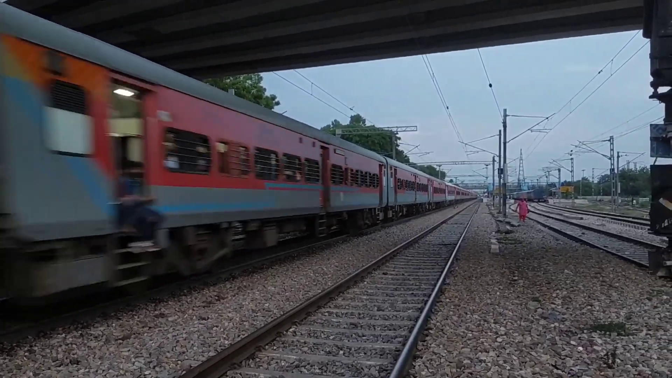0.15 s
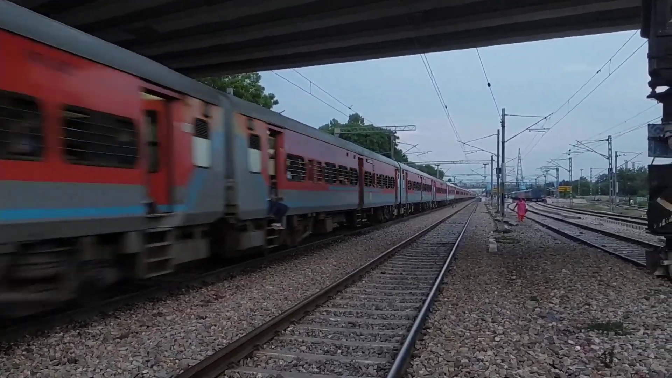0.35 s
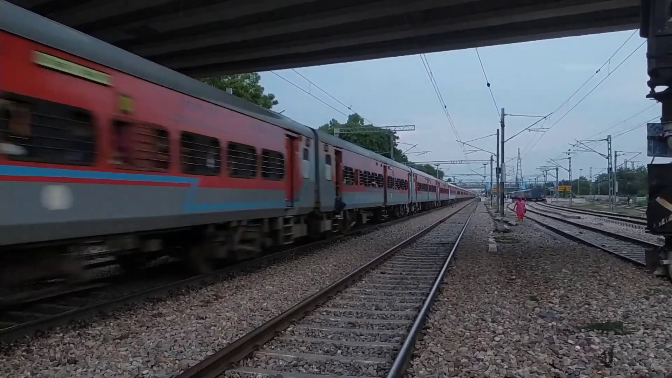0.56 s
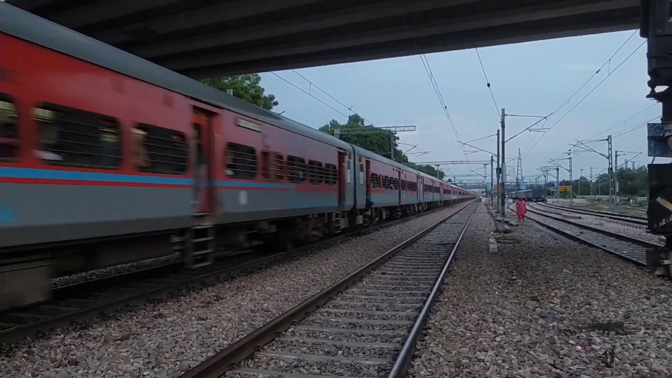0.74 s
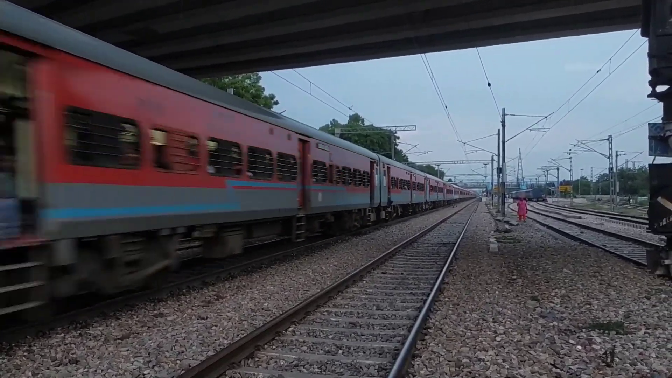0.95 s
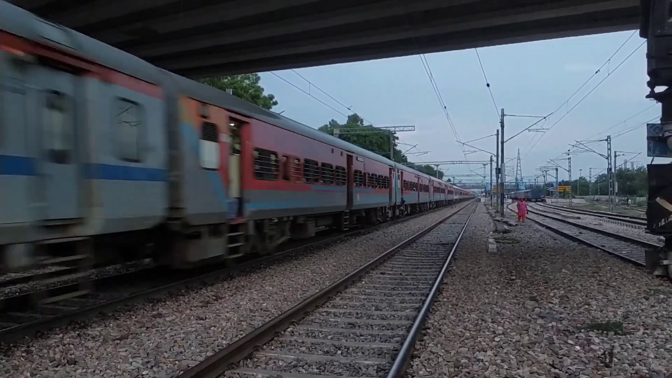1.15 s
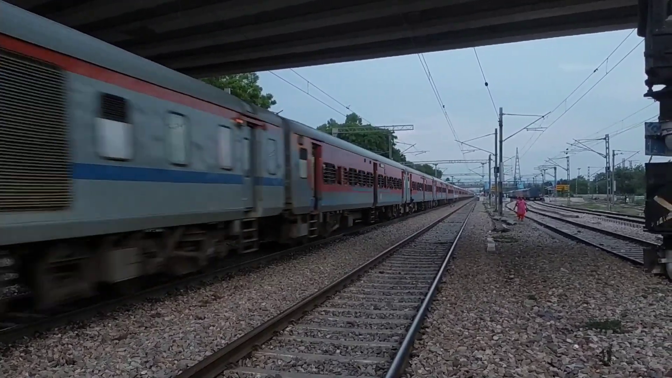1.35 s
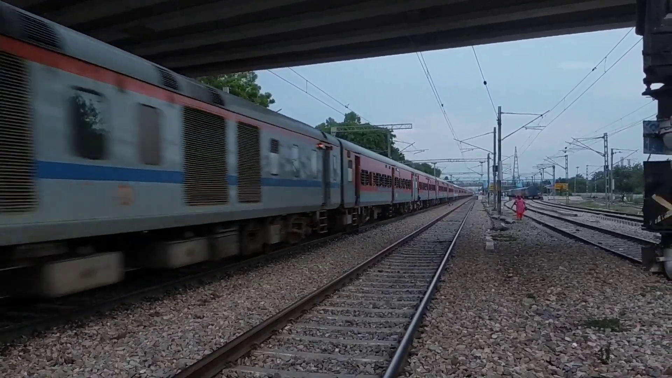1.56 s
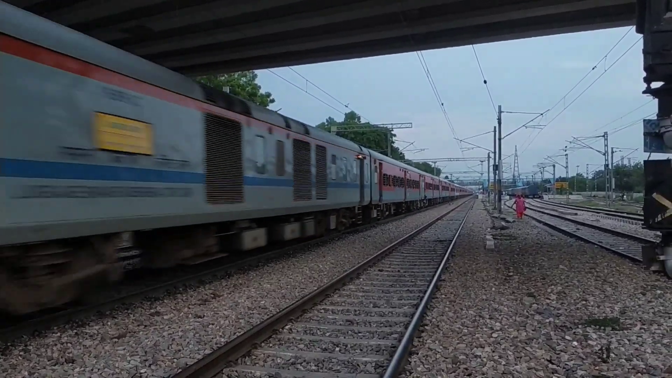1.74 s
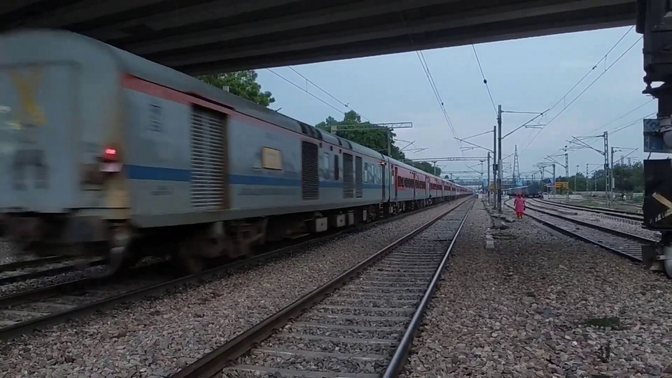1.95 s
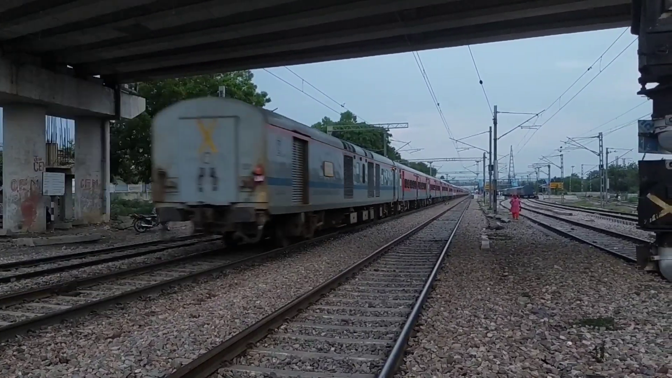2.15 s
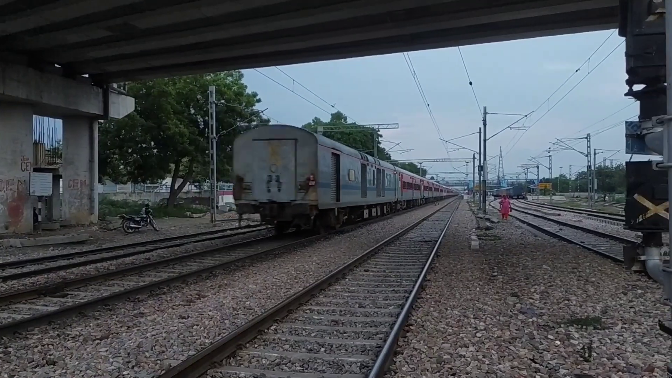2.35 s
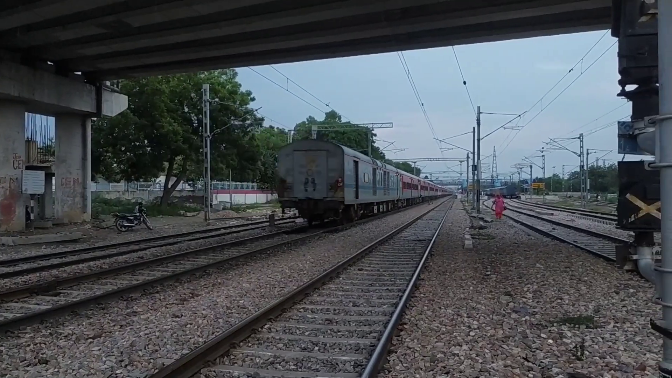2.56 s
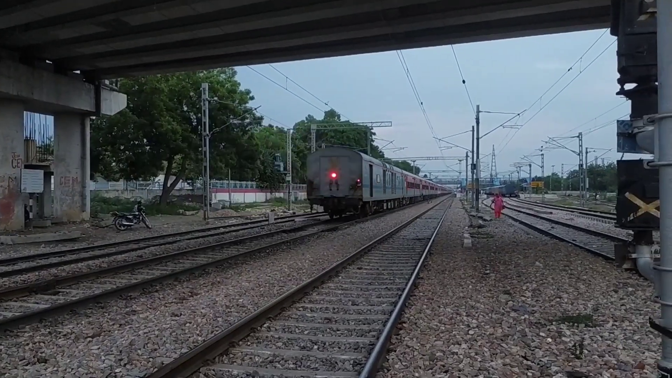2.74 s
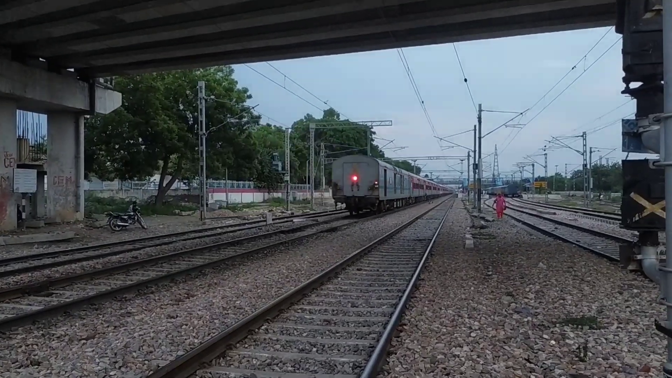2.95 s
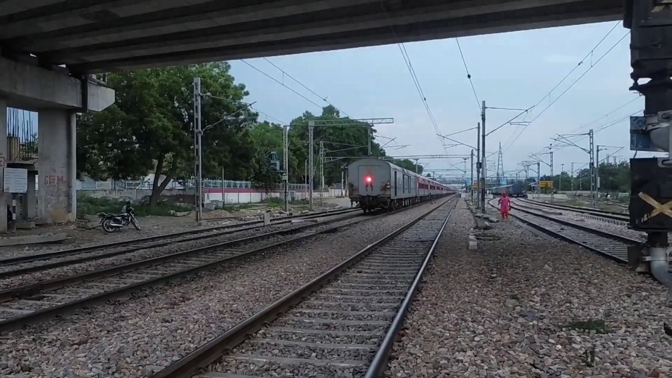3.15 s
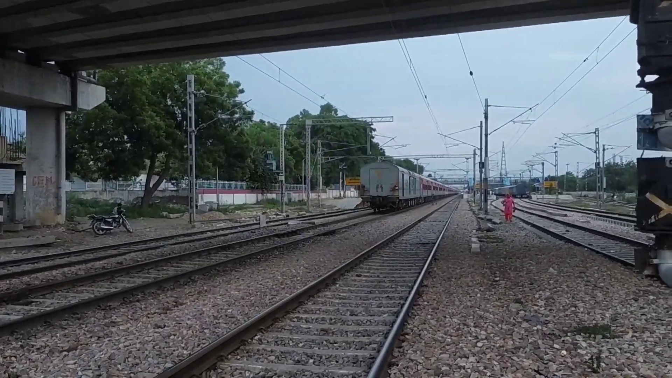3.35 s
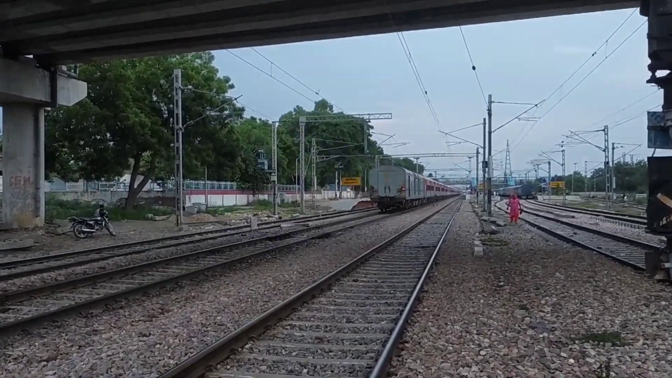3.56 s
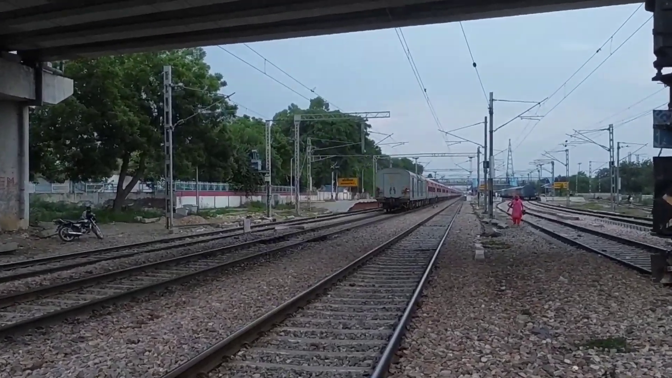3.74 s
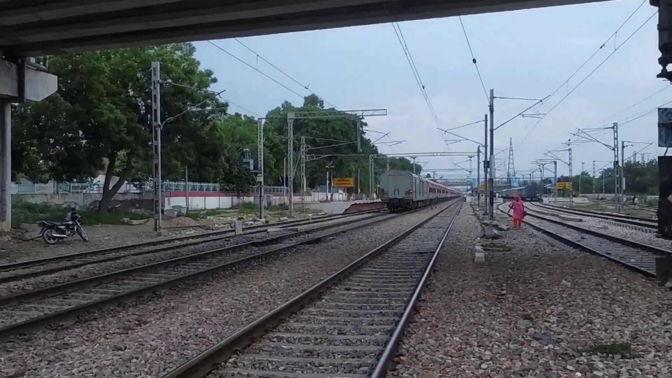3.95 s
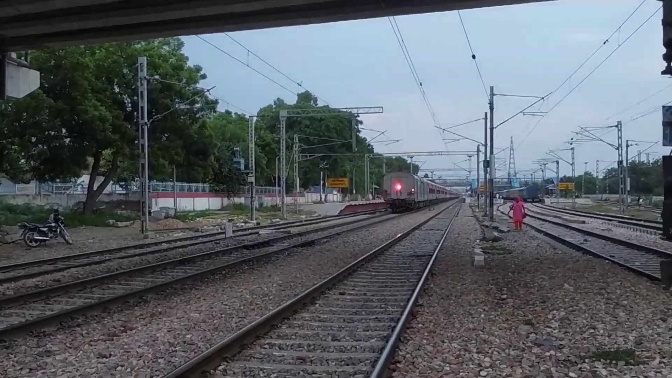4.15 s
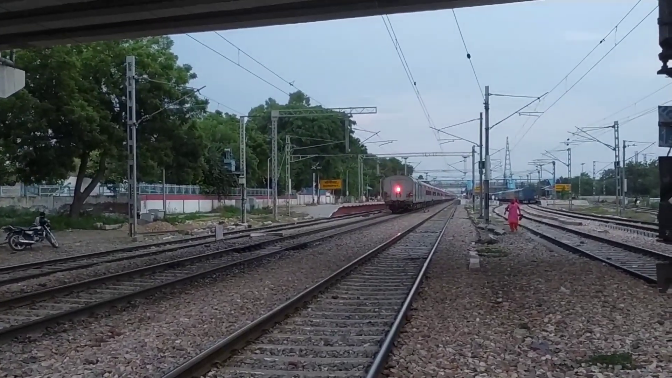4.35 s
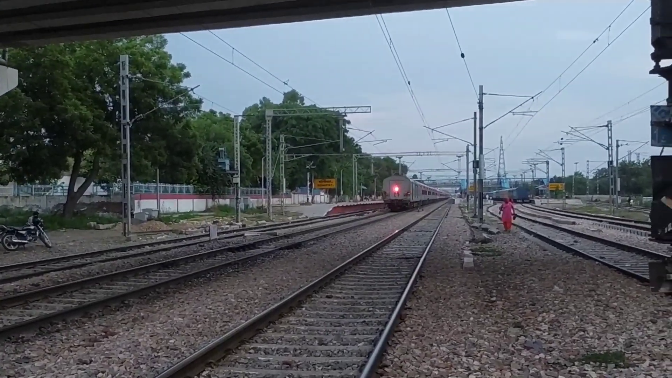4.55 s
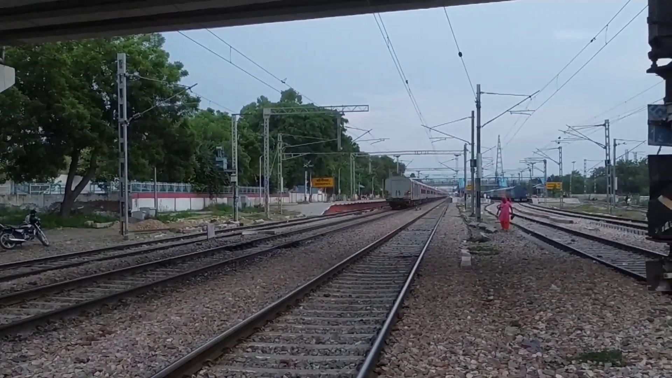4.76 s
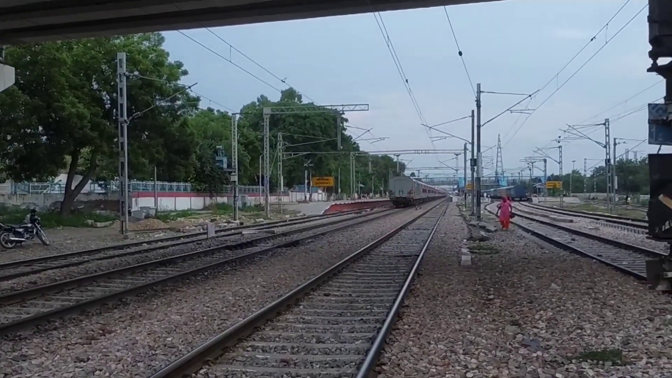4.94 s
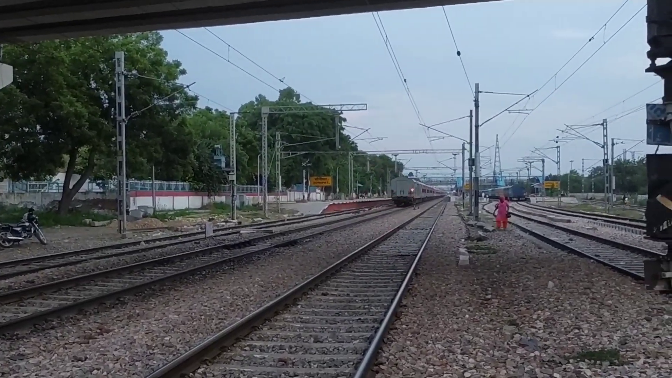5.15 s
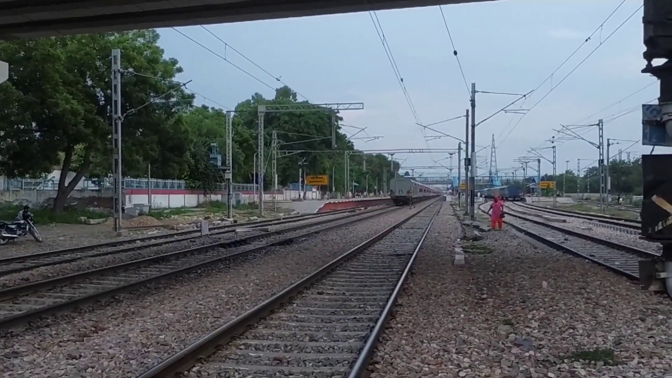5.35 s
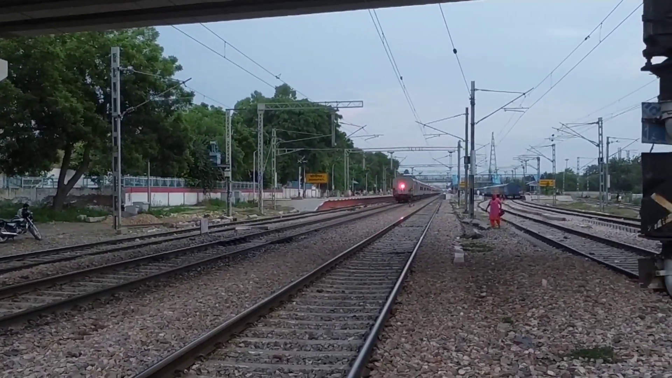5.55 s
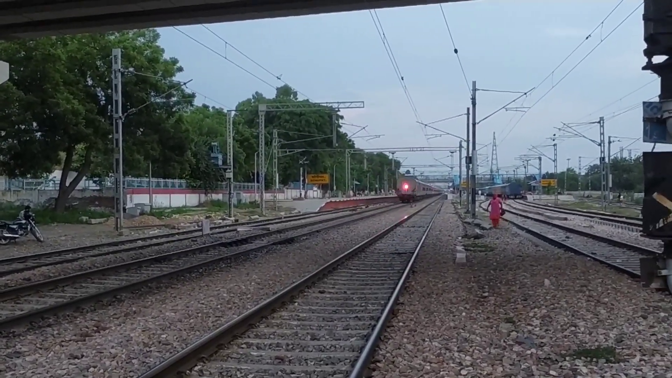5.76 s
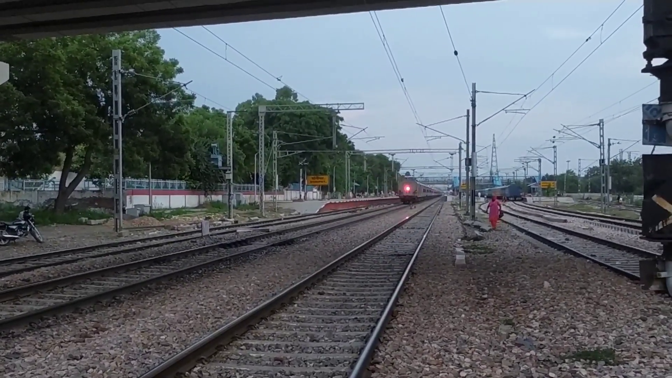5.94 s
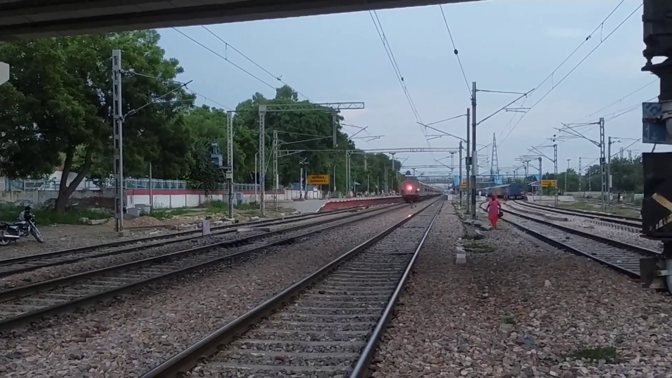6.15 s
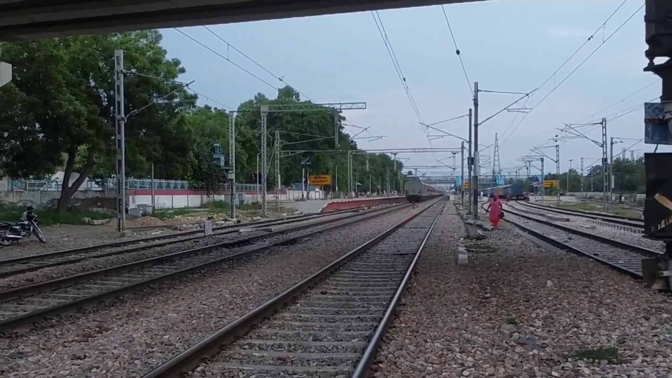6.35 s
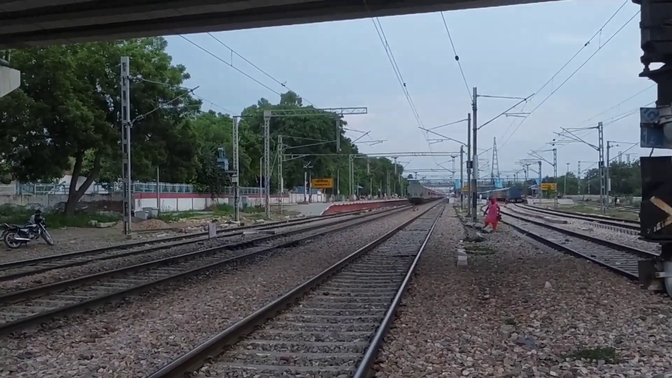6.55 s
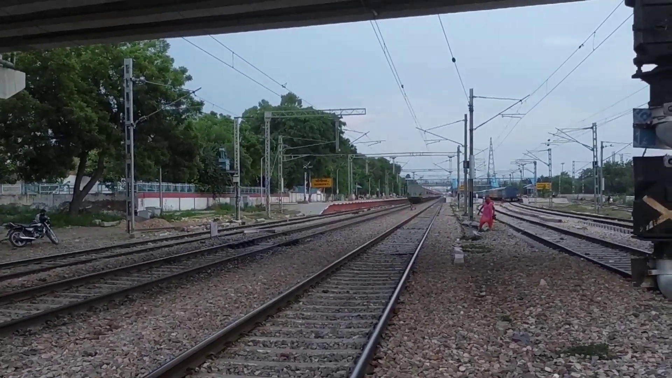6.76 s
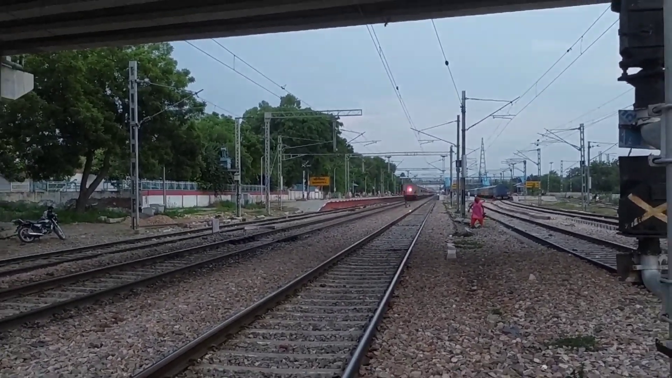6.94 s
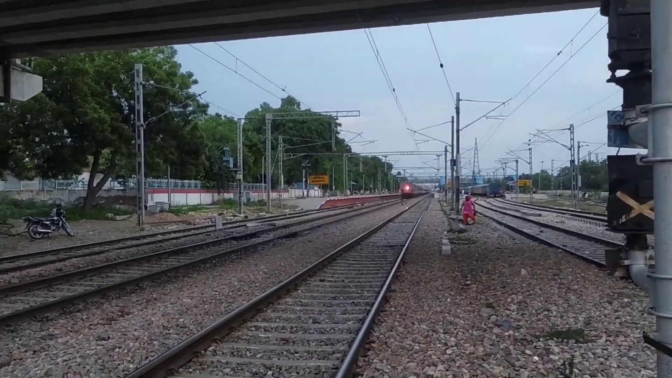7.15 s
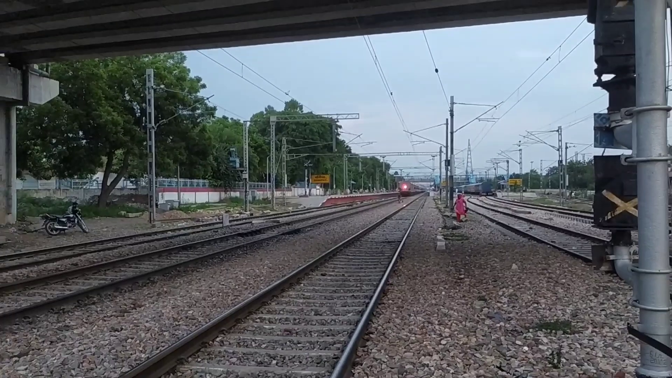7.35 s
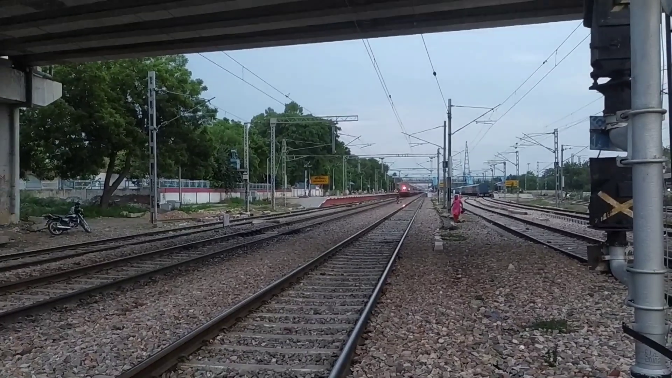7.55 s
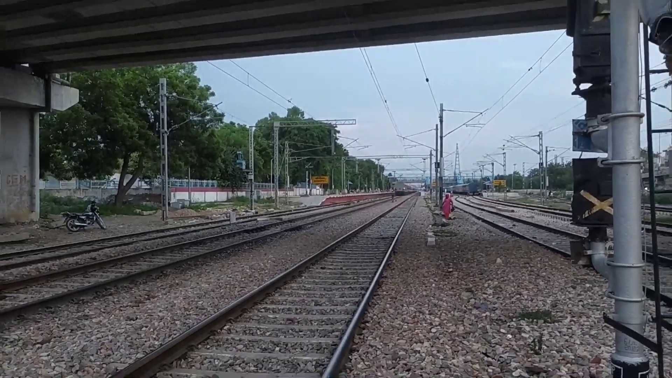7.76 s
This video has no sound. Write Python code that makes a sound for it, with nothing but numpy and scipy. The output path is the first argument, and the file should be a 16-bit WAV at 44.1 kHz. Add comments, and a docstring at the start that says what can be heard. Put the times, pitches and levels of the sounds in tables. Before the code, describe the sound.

From 0 to about 1.7 seconds a fast train passes very close: a loud, dense mid-low roar with bass rumble, bright ringing wheels and high hiss, surging about twice a second. Irregular thuds and clangs come roughly every tenth of a second, with short squeals, some sliding downward, and grainy scrapes. The tail passes near 1.75; hiss and roar fall steeply by 3 seconds, with last knocks and scrapes around 2.4 to 2.9 and a low hollow boom at 2.9. Singing rails remain in narrow metallic bands, fading over faint rumble. A distant steady horn emerges after 4, swells through 5 to 7 and fades by 7.8. Steel clacks sound at 4.3 and, sharper, 4.95. Air thumps the microphone near 5.1 and 5.6, amid a faint fluttering squeak at 5.3 to 5.65. A buzzy two-note vehicle horn toots briefly at 5.85 from the bridge. Soft low gusts continue near the end.

```python
"""The last coaches of a passenger train rush past under a road bridge and run off into the distance.
Filtered noise makes the wheels' roar, rumble, ring and hiss; decaying modes make them knock on the rails.
The rails sing on in a few narrow bands behind the train; swelling bands of noise scrape and squeal.
Steady partials sound a far horn, a fluttering squeak and a toot on the bridge, with one low boom and clacks.
The train's wake buffets the microphone with gusts of low noise and short swings of air."""
import sys
import numpy as np
from scipy import signal
from scipy.fft import rfft, irfft, next_fast_len
from scipy.io import wavfile
from scipy.ndimage import uniform_filter1d

SR = 44100
rng = np.random.default_rng(int(sys.argv[2]) if len(sys.argv) > 2 else 0)


def generate_wav(sig):
    """Save sig (samples, or channels by samples) to the path in sys.argv[1] as 16-bit PCM at SR."""
    pcm = np.round(np.clip(np.atleast_2d(sig).T, -1, 1) * 32767).astype(np.int16)
    wavfile.write(sys.argv[1], SR, pcm)


N = 343978

# spectral frames: window and step in samples, then the clock, frame times and bin frequencies
SIZE, HOP = 1024, 256
TIME = np.arange(N) / SR
FRAME_S = np.arange(N // HOP + 5)[:, None] * HOP / SR
BIN_HZ = np.fft.rfftfreq(SIZE, 1 / SR)
# the train's speed, and the moment its last wheels draw level with the microphone
SPEED_M_PER_S, TAIL_S = 32.35, 1.74
# the roar and rumble surge as bogies go by: time between surges and the moment of one of them
SURGE_EVERY_S, SURGE_AT_S = 0.479, 0.53


def amp(db):
    """Decibels to gain."""
    return np.exp(np.asarray(db) * (np.log(10) / 20))


def evened(x):
    """Scales to an rms of 1."""
    return x / np.sqrt(np.mean(abs(x) ** 2) + 1e-20)


def read(points):
    """Reads a spectrum on a log-frequency axis."""
    hz, value = np.transpose(points)
    return np.interp(np.log(BIN_HZ + 1), np.log(hz + 1), value)


def add(mix, start_s, sound):
    """Mixes a sound in at its start time."""
    part = mix[..., max(round(start_s * SR), 0):][..., :sound.shape[-1]]
    part += sound[..., :part.shape[-1]]


def sides(balance_db):
    """Left and right gains for a left-right difference."""
    return np.array([amp(balance_db / 2), amp(-balance_db / 2)])


def smooth(per_frame):
    """Joins frame values by straight lines."""
    return np.interp(TIME, FRAME_S[:, 0], per_frame)


def together(*levels_db):
    """Level of several sounds at once, their powers added."""
    return 10 * np.log10(sum(amp(db) ** 2 for db in levels_db) + 1e-20)


def hump(middle_s, length_s):
    """A smooth rise and fall in dB below its top, 10 dB down at length_s either side."""
    return -10 * ((FRAME_S - middle_s) / length_s) ** 2


def gone(start_s=1.64, span_s=0.87):
    """A straight ramp from 0 to 1, by default as the last van passes and runs down the line."""
    return np.clip((FRAME_S - start_s) / span_s, 0, 1)


def receding(reach_m, steepness, loss_db_per_m=0):
    """Level change as the tail draws away: by distance (steepness 1 = inverse square) and absorption."""
    metres = SPEED_M_PER_S * np.maximum(FRAME_S - TAIL_S, 0)
    return -10 * steepness * np.log10(1 + (metres / reach_m) ** 2) - loss_db_per_m * metres


def surge(every_s, at_s, last_s=2.33, fade_s=0.25):
    """A regular swell between -1 and 1 that fades out once the train is by."""
    return np.cos(2 * np.pi * (FRAME_S - at_s) / every_s) * (1 - gone(last_s, fade_s))


def bearing_lag(near_ms=0.31, far_ms=0.054, bass_hz=420):
    """Lag between ports, shrinking as the train moves from the side to straight ahead; less in the bass."""
    lag_ms = near_ms + (far_ms - near_ms) * gone(1.65, 1.17)
    return lag_ms * BIN_HZ / np.hypot(BIN_HZ, bass_hz)


def patches(size):
    """Random unevenness, smooth over size = (frames, bins)."""
    z = rng.standard_normal((len(FRAME_S), len(BIN_HZ)), dtype=np.float32)
    over_time = uniform_filter1d(z, size[0], 0, mode="wrap")
    return evened(uniform_filter1d(over_time, size[1], 1, mode="wrap"))


def resonances(modes, shift=1):
    """Power response of steep-sided resonances, their centres scaled by shift."""
    # the factor .78 makes each width the full width at half power
    return sum(amp(db) ** 2 / (1 + ((BIN_HZ - hz * shift) / (.78 * width)) ** 2) ** 2
               for hz, width, db in modes)


def noise(colour, level_db, likeness, lag_ms=0, balance_db=0):
    """Noise of a given colour and level as two microphone ports hear it, the right one first."""
    draws = rng.standard_normal((2, len(FRAME_S), len(BIN_HZ), 2), dtype=np.float32)
    left, other = draws.view(np.complex64)[..., 0]
    same = np.float32(np.clip(likeness, 0, 1))
    lead = np.float32(2 * np.pi * BIN_HZ * lag_ms / 1000)
    right = (same * left + np.sqrt(1 - same ** 2) * other) * (np.cos(lead) + 1j * np.sin(lead))
    size = np.float32(colour / np.sqrt(np.sum(colour ** 2, -1, keepdims=True)) * amp(level_db))
    pair = np.array([left, right]) * size * np.float32(sides(balance_db + np.zeros_like(FRAME_S)))
    return signal.istft(pair.swapaxes(1, 2), nperseg=SIZE, noverlap=SIZE - HOP)[1][:, :N]


def tones(lines, clock):
    """Steady partials from random phases that follow one wavering clock."""
    return sum(amp(db) * np.sqrt(2) * np.sin(2 * np.pi * (hz * clock + rng.random())) for hz, db in lines)


# relative spectrum of the near roar: pitch_hz, level_db (per Hz)
ROAR_COLOUR = [(60, -33), (120, -58), (160, -4.5), (250, -3), (320, -2.5), (400, -6), (520, -3),
               (650, -0.5), (780, 1.5), (900, -2), (1050, -5), (1400, -11.5), (2000, -14), (4000, -48)]
# likeness of the two ports to the near train, also used by wheels and sliding: pitch_hz, likeness (0-1)
NEAR_LIKENESS = [(30, 0.99), (300, 0.95), (450, 0.74), (800, .76), (950, 0.42), (1200, 0.5), (2250, 0.57),
                 (2600, 0.2), (3000, 0.08), (9000, 0)]


def rolling(near_db=-15.0, surge_db=1.1, far_db=-36.5, patchy_db=1.5, sink=0.24, ground_loss_db=-1.5,
            end_dip_db=-6, last_surge_db=-26, last_surge_s=2.6):
    """Rough treads shake sleepers and bogies; the roar briefly deepens, recedes and loses low middle to the ground."""
    low_middle = np.exp(-np.log2((BIN_HZ + 1) / 380) ** 2)
    deeper = read([(hz * (1 - sink), db) for hz, db in ROAR_COLOUR])
    turned = gone(2.2, 0.68) * (1 - gone(2.6, 0.52))
    colour_db = (1 - turned) * read(ROAR_COLOUR) + turned * deeper
    colour = amp(colour_db + ground_loss_db * low_middle * gone(6.2, 0.8))
    near = near_db + surge_db * surge(SURGE_EVERY_S, SURGE_AT_S) + receding(reach_m=63.7, steepness=9.3)
    far = far_db + receding(reach_m=110, steepness=1.02) + end_dip_db * gone(7.2, 0.7)
    level = together(near, far, last_surge_db + hump(last_surge_s, 0.097))
    level = level + patchy_db * patches(size=(9, 7))
    return noise(colour, level, read(NEAR_LIKENESS), bearing_lag(), -0.32)


# relative spectrum of the bass: pitch_hz, level_db (per Hz)
RUMBLE_COLOUR = [(10, -20), (25, -4), (45, 3), (85, 3), (120, -31), (170, 0), (400, -53)]


def rumble(level_db=-28.0, last_van_db=-5.0, surge_db=1.5, lumpy_db=1, dulling_db=-3):
    """Lumpy bass, alike at both ports, surges with the bogies, drops with the last van and dulls with distance."""
    dulling = dulling_db * gone(2.0, 3.5) * np.log2(1 + (BIN_HZ / 100) ** 4)
    colour = amp(read(RUMBLE_COLOUR) + dulling)
    level = level_db + last_van_db * gone(1.4, 0.16) + surge_db * surge(SURGE_EVERY_S, SURGE_AT_S)
    level = level + receding(reach_m=49.0, steepness=0.93) + lumpy_db * patches(size=(10, 12))
    return noise(colour, level, 1.0, balance_db=-2.0)


# relative spectrum of the broad ring: pitch_hz, level_db (per Hz)
RING_COLOUR = [(900, -17), (1400, -4.5), (1650, -1.5), (2050, -3.5), (2400, 3), (2850, 1.5), (3250, -7.5),
               (3900, -11), (6000, -45)]
# wheel modes before the pitch drop of receding: pitch_hz, width_hz, level_db (on the scale of the broad ring)
WHEEL_MODES = [(1860, 90, 4), (2230, 90, 2.5), (2400, 80, 5), (2690, 110, 0), (4177, 22, -12)]
# rise and fall of the ring as coach after coach goes by: time_s, level_db (relative)
RING_SWELL = [(0, 1.5), (.3, 0), (.42, -3), (.6, -.5), (.75, 1.5), (1.0, .5), (1.35, -1.5), (1.5, .5),
              (1.72, -0.5), (1.85, -0.5), (2.15, -0.5), (2.5, 1.5)]


def wheels(level_db=-18.0, patchy_db=3.0, throb_db=0.75, doppler=0.066, damping=0.54,
           far_balance_db=-4.5, settling=0.34):
    """Wheel modes ring unevenly, swell as coaches pass and throb at random, then sink and blur as they recede."""
    modes = resonances(WHEEL_MODES, 1 - doppler * gone()) * (1 - damping * gone(1.6, 0.67))
    colour = np.sqrt(amp(read(RING_COLOUR)) ** 2 + abs(modes))
    uneven = patchy_db * patches(size=(14, 3)) + throb_db * patches(size=(8, 200))
    uneven = uneven * (1 - settling * gone())
    level = level_db + np.interp(FRAME_S, *np.transpose(RING_SWELL))
    level = level + receding(reach_m=4.5, steepness=0.54, loss_db_per_m=0.08)
    balance = -0.9 + far_balance_db * gone()
    return noise(colour, level + uneven, read(NEAR_LIKENESS), bearing_lag(0.42, 0.38), balance)


# relative spectrum of the hiss: pitch_hz, level_db (per Hz)
HISS_COLOUR = [(2000, -6.5), (3600, -1.5), (4700, -3.5), (5800, -5.5), (7200, -3), (8600, 1), (9500, 3),
               (10400, -5), (11500, -17.5), (13000, -16), (14500, -35), (16000, -43)]


def sliding(level_db=-18.0, last_van_db=-2.5, patchy_db=3.0, flicker_db=0.32, air_db_per_khz=-4.0,
            surge_db=.5):
    """Hiss from the contact patches, softer under the last van; air takes the top off it with distance."""
    air = air_db_per_khz * gone(2, 3.5) * np.maximum(BIN_HZ / 1000 - 9.5, 0)
    colour = amp(read(HISS_COLOUR) + air)
    uneven = patchy_db * patches(size=(8, 4)) + flicker_db * patches(size=(6, 250))
    uneven = uneven + surge_db * surge(every_s=0.44, at_s=0.17)
    level = level_db + last_van_db * gone(1.3, 0.49)
    level = level + receding(reach_m=17.3, steepness=1.28, loss_db_per_m=0.03)
    return noise(colour, level + uneven, read(NEAR_LIKENESS), bearing_lag(0.415, 0.092), 2.3)


# low resonances of the coach bodies: pitch_hz, width_hz, level_db (relative)
BODY_MODES = [(170, 17, -3), (216, 18, 1.5), (291, 60, -1.5)]


def drumming(level_db=-41.0, far_gain_db=1.1, uneven_db=2.5):
    """The long coach bodies drum in a few low resonances, which carry well over the ground."""
    colour = np.sqrt(resonances(BODY_MODES)) / (1 + (140 / (BIN_HZ + 1)) ** 8)
    level = level_db + far_gain_db * gone(4.3, 0.7) + uneven_db * patches(size=(14, 3))
    return noise(colour, level, 0.97, .05, -0.78)


# bands in which the rails carry vibration far: pitch_hz, width_hz, level_db (relative)
RAIL_BANDS = [(620, 154, -4), (755, 73, -1), (1153, 116, -0.8), (1190, 18, -5), (1712, 76, 0.5),
              (2195, 46, 2), (2260, 36, 0.5), (2450, 110, -10.5), (2890, 230, -13), (5170, 880, -17.5)]
# likeness of the two ports to the singing rails: pitch_hz, likeness (0-1)
FAR_LIKENESS = [(30, 1), (700, 0.98), (1200, 0.66), (1700, 0.71), (2230, 0.96), (2600, 0.38), (5000, 0.092)]


def rails(level_db=-28, open_db=4.0, patchy_db=1.0):
    """Rails lead the wheels' vibration back along the track in narrow bands, clearest just behind the train."""
    level = level_db + open_db * gone(2.0, 0.5) + receding(reach_m=32.7, steepness=0.96)
    level = level + patchy_db * patches(size=(14, 5))
    return noise(np.sqrt(resonances(RAIL_BANDS)), level, read(FAR_LIKENESS), 0.049, 0.1)


def struck(modes, rise_s, spread=0.056):
    """One blow on a set of modes, detuned a little at random; the right port hears it first."""
    hz, db, t60 = np.transpose(modes)[:, :, None]
    detune, turn = rng.uniform(-0.88, 1, (2, len(modes), 1))
    t = np.arange(SR // 4) / SR
    ring = amp(db - 60 * t / t60) * np.sin(2 * np.pi * hz * (1 + spread * detune) * t + np.pi * turn)
    blow = ring.sum(0) * (1 - np.exp(-t / rise_s))
    blow = blow / np.sqrt(np.mean(blow[:SR // 25] ** 2))  # rms 1 over the first 40 ms
    return np.array([np.interp(t - .0002, t, blow), blow])


# low modes of a knock, before detuning: pitch_hz, level_db (relative), t60_s
THUD_MODES = [(71, -13, 0.26), (164.3, -4.5, 0.21), (217.2, -2, 0.31), (253.4, -0.5, 0.42),
              (290.4, 6, 0.083), (377, -6, 0.18)]
# higher modes of a knock, before detuning: pitch_hz, level_db (relative), t60_s
CLANG_MODES = [(518, -0.5, 0.1), (631, -9, 0.36), (674, -9.5, 0.19), (768, -2.5, 0.27), (841, 3, 0.14),
               (916, -4.5, 0.21), (1018, -9.5, 0.16)]
# axles crossing a rail joint: start_s, thud_level_db, clang_level_db (before each layer's trim)
KNOCKS = [(0.012, -17, -20), (0.1, -17.5, -20), (0.186, -16.5, -16), (0.296, -16, -16), (0.44, -15, -12),
          (0.54, -22, -18), (0.626, -15, -22), (0.754, -14, -31), (0.878, -17, -15), (0.941, -19, -22),
          (0.973, -17.5, -15), (1.055, -17, -24), (1.167, -15, -20), (1.235, -17.5, -19),
          (1.334, -19, -14.5), (1.402, -15, -11.5), (1.43, -18.5, -22), (1.505, -14.5, -16.5),
          (1.617, -17, -19.5), (1.783, -17, -26), (1.835, -26, -14), (1.872, -13, -19), (1.932, -26, -14),
          (1.99, -21, -22), (2.03, -19, -13),  (2.29, -17, -25), (2.35, -27, -14.5), (2.374, -17, -24),
          (2.43, -22.5, -24), (2.806, -23.5, -29), (2.88, -28, -27), (4.132, -41, -33), (4.654, -42, -32.5),
          (4.739, -37, -32)]


def knocks(thud_trim_db=-5.5, clang_trim_db=-5):
    """Axle after axle hits the joint; each knock thuds in the sleepers and clangs in the frame."""
    out = np.zeros((2, N))
    for start_s, thud_db, clang_db in KNOCKS:
        thud = amp(thud_db + thud_trim_db) * struck(THUD_MODES, 0.0033)
        clang = amp(clang_db + clang_trim_db) * struck(CLANG_MODES, 0.0058)
        add(out, start_s, thud + clang)
    return out


def rub(length_s, centre_hz, octaves, balance_db, glide_hz_per_s=0, grain_db=0):
    """Steel sticks and slips on steel, swelling and dying: a wide band grates, a narrow one whistles."""
    n = next_fast_len(int(4 * length_s * SR))
    t = (np.arange(n) - n / 2) / SR
    band = np.exp(-(np.log2((np.fft.rfftfreq(n, 1 / SR) + 1) / centre_hz) / octaves) ** 2 / 2)
    # one-sided spectrum: a complex voice, so that a turning phase can slide its pitch
    voice = np.fft.ifft(rfft(rng.standard_normal((2, n))) * band, n)
    voice = voice * np.exp(1j * np.pi * glide_hz_per_s * t ** 2)
    grain = uniform_filter1d(uniform_filter1d(rng.standard_normal(n), size=20), size=130)
    slips = amp(grain_db * evened(grain))
    swell = np.exp(-2 * (t / length_s) ** 2)
    return sides(balance_db)[:, None] * evened(voice.real * slips * swell) * np.sqrt(np.mean(swell ** 2))


# short scrapes of steel, level before trim:
# middle_s, level_db, length_s, centre_hz, width_octaves, balance_db (left-right)
SCRAPES = [(1.15, -27.5, 0.15, 1630, .2, -3), (1.45, -21.5, 0.034, 1470, 0.34, -2),
           (1.58, -28.5, .12, 4000, .35, 1), (1.92, -22, .045, 2200, .6, -2),
           (1.93, -20.5, 0.028, 8400, 0.22, 3), (2.036, -20, 0.019, 8600, 0.18, 1),
           (2.04, -25.5, 0.021, 4000, .5, -1), (2.4, -26.5, .05, 2410, .15, -6),
           (2.64, -30, .08, 2600, .15, -4), (2.67, -31.5, 0.12, 3600, 0.77, -2),
           (2.69, -29, 0.14, 8700, 0.21, 5), (2.927, -32.5, 0.043, 8500, 0.19, 5),
           (4.772, -31.5, 0.029, 2300, 0.13, -4), (5.69, -47, .04, 9000, .13, 5),
           (5.706, -44, 0.009, 4600, 0.06, 1), (5.927, -36, .03, 2800, .7, -1),
           (5.92, -43, .018, 9000, .14, 1), (5.99, -42, .11, 2400, .45, -1), (5.98, -47, .15, 9200, .11, 1),
           (6.05, -49, 0.35, 5500, 0.52, 3), (6.228, -42, 0.022, 3300, 0.7, 1),
           (6.438, -39, .018, 2300, 0.49, 3)]
# wheels singing out and flanges squealing, level before trim:
# middle_s, level_db, length_s, pitch_hz (at the middle), width_octaves, balance_db (left-right), glide_hz_per_s
SQUEALS = [(0.025, -22, .035, 2300, .04, -1, 0), (0.25, -24.5, .14, 1850, .04, -1, -300),
           (0.78, -21, .035, 2400, .01, -1, -400), (0.97, -27, .09, 2400, .015, -1, -400),
           (0.785, -27, .035, 4180, .005, 1, -600), (0.785, -32, .035, 4820, .008, 1, -600),
           (1.5, -24, .07, 2740, .04, 0, -1200), (1.62, -23, .09, 2450, .05, -1, -2000),
           (2.67, -36.5, .1, 7430, .005, 0, -300), (5.15, -48, .12, 9380, .018, -1, -1000),
           (5.41, -43.3, .23, 9035, .004, -2, 150), (5.45, -47, .24, 9260, .026, -1, 0),
           (6.35, -53, .20, 9380, .018, 0, 0)]


def flanges(scrape_trim_db=1.0, squeal_trim_db=3.5, grain_db=3):
    """Steel rubs in grainy scrapes and smooth squeals, many of which slide in pitch."""
    out = np.zeros((2, N))
    for rows, trim_db, grain in (SCRAPES, scrape_trim_db, grain_db), (SQUEALS, squeal_trim_db, 0):
        for middle_s, db, *shape in rows:
            sound = amp(db + trim_db) * rub(*shape, grain_db=grain)
            add(out, middle_s - sound.shape[1] / SR / 2, sound)
    return out


def boom(level_db=-25.5, at_s=2.885, hz=221, rise_s=0.013, t60_s=0.79):
    """The body of the last van booms once on one low note."""
    t = np.maximum(TIME - at_s, 0)
    return amp(level_db - 60 * t / t60_s) * (1 - np.exp(-t / rise_s)) * np.sin(2 * np.pi * hz * t)


# swell of a far two-tone horn: time_s, level_db (relative)
HORN_SWELL = [(3.9, -60), (4.6, -7.5), (5.4, -0.5), (6.0, -0.5), (6.7, 2), (7.15, 0.5), (7.52, -3),
              (7.78, -19.5)]
# partials of the horn, before the swell and a slight waver: pitch_hz, level_db
HORN_LINES = [(277.3, -47), (554.5, -47), (651.4, -51.5), (834, -54.5), (1109, -57.5), (1298, -58)]


def horn(level_db=0.0, waver=0.00201):
    """One long blast from far down the line swells as the air carries it, its pitch wandering slightly."""
    clock = np.cumsum(1 + waver * smooth(patches(size=(30, 1))[:, 0])) / SR
    swell = amp(level_db + np.interp(TIME, *np.transpose(HORN_SWELL)))
    return swell * tones(HORN_LINES, clock)


# sharp clacks of steel down the line: start_s, level_db
CLACKS = [(4.285, -29), (4.95, -31), (4.958, -23.5), (4.968, -29.5)]
# relative spectrum of a clack: pitch_hz, level_db (per Hz)
CLACK_COLOUR = [(400, -26), (1000, -1), (1500, -7), (2400, 4), (3300, -5), (5000, -15), (7000, -28),
                (11000, -50)]


def clacks(level_db=0.0, rise_s=.001, decay_s=0.0076):
    """Loose steel snaps against steel: a quick edge of coloured noise that dies within milliseconds."""
    out, t = np.zeros((2, N)), np.arange(SIZE) / SR
    colour = evened(amp(read(CLACK_COLOUR)))
    for start_s, db in CLACKS:
        burst = rng.standard_normal((3, SIZE)) * (1 - np.exp(-t / rise_s)) * np.exp(-t / decay_s)
        # the centred filter delays the burst by half a window, so it is placed that much earlier
        left, right, shared = signal.fftconvolve(burst, np.fft.fftshift(irfft(colour))[None], axes=1)
        pair = (np.array([left, right]) + shared) / np.sqrt(2)
        add(out, start_s - SIZE / SR / 2, amp(db + level_db) * pair)
    return out


# eddies striking one port: start_s, level_db (before trim), pitch_hz (mid-slowing), decay_s,
# port (0 left, 1 right)
EDDIES = [(5.115, -6.5, 284, 0.0038, 0), (5.122, -10.5, 135, 0.0063, 0), (5.136, -21, 51.3, 0.045, 0),
          (5.172, -20.5, 168, 0.015, 0), (5.558, -16, 204, 0.0091, 1), (5.606, -16.5, 198.5, 0.03, 1),
          (5.628, -1.5, 238, 0.0034, 1), (5.642, -7.5, 152, 0.0086, 1), (5.654, -9.5, 168, 0.014, 1)]


def wake(trim_db=2, slowing=0.15, rise_s=0.00048, churn=0.19, churn_hz=640):
    """Each eddy shoves the air at one port, which churns and swings a few times, ever slower."""
    out, t = np.zeros((2, N)), np.arange(SR // 6) / SR
    low_pass = signal.butter(6, churn_hz, fs=SR, output="sos")
    for start_s, db, hz, decay_s, port in EDDIES:
        turns = np.cumsum(hz * (1 + slowing * (2 * np.exp(-t / decay_s) - 1))) / SR
        churning = churn * evened(signal.sosfilt(low_pass, rng.standard_normal(len(t))))
        air = churning - np.sin(2 * np.pi * turns)
        thump = signal.sosfilt(low_pass, air * np.exp(-t / decay_s) * (1 - np.exp(-t / rise_s)))
        add(out[int(round(port))], start_s, amp(db + trim_db) * thump)
    return out


# relative spectrum of the stirred air: pitch_hz, level_db (per Hz)
DRAUGHT_COLOUR = [(10, -10), (28, -2), (45, 23), (65, -2), (100, -14), (250, -47)]
# gusts behind the train: middle_s, level_db, length_s (from the middle to 10 dB down)
GUSTS = [(5.2, -45, 0.15), (5.66, -34.5, 0.22), (6.45, -42, 0.52), (7.096, -39.5, 0.38)]


def draught(gusty_db=2):
    """Stirred air tumbles over the two ports, only partly alike, gust by gust."""
    level = together(*(db + hump(middle_s, length_s) for middle_s, db, length_s in GUSTS))
    return noise(amp(read(DRAUGHT_COLOUR)), level + gusty_db * patches(size=(14, 30)), 0.65)


# pulses of a fluttering squeak, level before trim: middle_s, level_db, length_s (to 10 dB down)
SQUEAK_PULSES = [(5.308, -41.5, .016), (5.387, -39.5, .016), (5.428, -43, .016), (5.495, -44, .025),
                 (5.548, -44, .016), (5.65, -45, .022)]
# partials of the squeak, before jitter: pitch_hz, level_db (relative)
SQUEAK_LINES = [(3042, -1.5), (3467, -4.5), (3989, -16)]


def squeak(trim_db=-1.0, between_db=-51, middle_s=5.42, length_s=0.26, jitter=0.00402):
    """A dry squeak of a few jittery partials sounds faintly and flares up in short pulses."""
    flares = [(middle_s, between_db, length_s)] + SQUEAK_PULSES
    level = together(*(db + hump(at_s, span_s) for at_s, db, span_s in flares))
    clock = np.cumsum(1 + jitter * smooth(patches(size=(2, 1))[:, 0])) / SR
    return smooth(amp(trim_db + level)[:, 0]) * tones(SQUEAK_LINES, clock)


# the two notes of a motor horn on the bridge: pitch_hz, level_db
TOOT_NOTES = [(436.8, -43), (510.2, -46.5)]
# relative level of the partials, one spectrum for each note: pitch_hz, level_db
TOOT_COLOURS = [
    [(440, -20), (880, -12), (1310, -4), (1750, -5), (2180, -4), (2620, 2), (3060, -5), (3500, -7),
     (4400, -11), (6100, -19), (6600, -11), (7900, -9), (9400, -9), (10500, -22), (12000, -45)],
    [(510, -15), (1020, -8), (1530, -1), (2040, 2), (2550, -7), (4000, -22), (12000, -50)],
]


def toot(level_db=0.0, start_s=5.85, rise_s=.06, hold_s=0.21, t60_s=1.0, waver=.001):
    """Two buzzing diaphragms sound briefly, phased differently at each port, and die away under the bridge."""
    t = np.arange(SR) / SR
    wander = evened(uniform_filter1d(rng.standard_normal(SR), size=900))
    clock = t + waver * np.cumsum(wander) / SR
    out, horns = np.zeros((2, N)), np.zeros((2, SR))
    for (pitch_hz, db), colour in zip(TOOT_NOTES, TOOT_COLOURS):
        hz = np.arange(pitch_hz, 11000, pitch_hz)
        lines = list(zip(hz, np.interp(hz, BIN_HZ, read(colour))))
        horns += amp(db) * evened(np.array([tones(lines, clock), tones(lines, clock)]))
    fall = amp(level_db - 60 * np.maximum(t - hold_s, 0) / t60_s)
    add(out, start_s, horns * np.minimum(t / rise_s, 1) * fall)
    return out


def scene():
    """The train, the track behind it, its wake and the horns."""
    train = rolling() + rumble() + wheels() + sliding() + drumming() + knocks() + flanges() + boom()
    track = rails() + clacks() + squeak()
    return train + track + wake() + draught() + horn() + toot()


EDGE_HZ = 15200


def record(dry, low_cut_hz=21):
    """The microphone's low cut, the full-scale limit, then the band limit."""
    low_cut = signal.butter(2, low_cut_hz, "high", fs=SR, output="sos")
    heard = np.clip(signal.sosfilt(low_cut, dry), -1, 1)
    band_limit = signal.firwin(511, EDGE_HZ, window=("kaiser", 9), fs=SR)
    return signal.oaconvolve(heard, band_limit[None], "same")


dry = scene()
out = record(dry)
generate_wav(out)
```